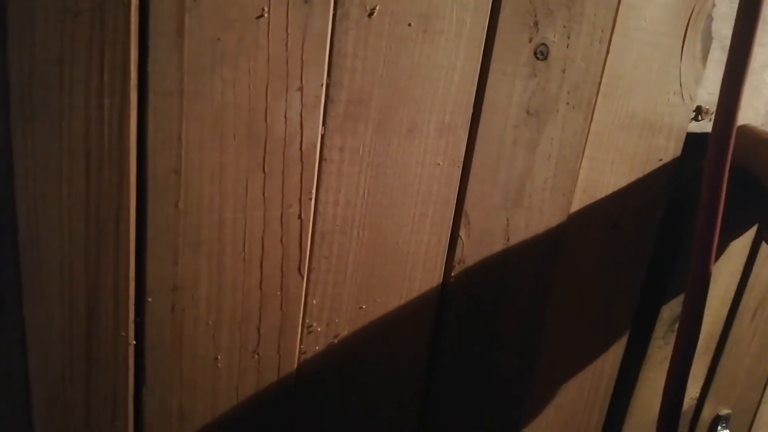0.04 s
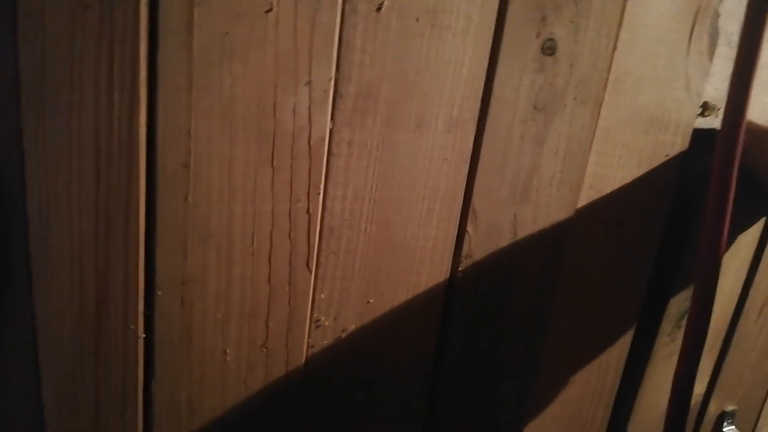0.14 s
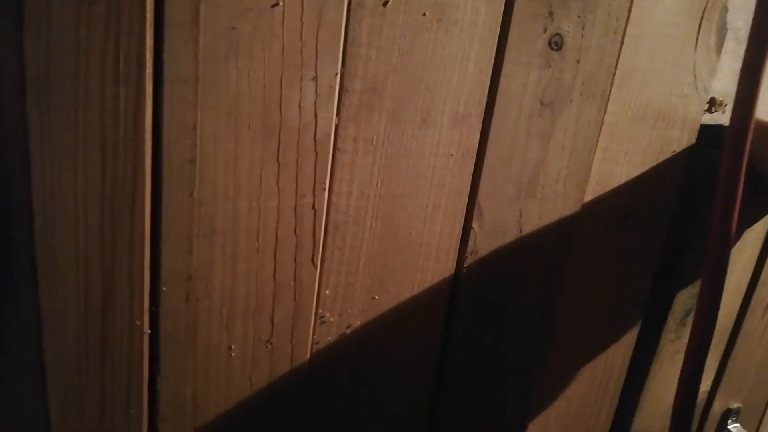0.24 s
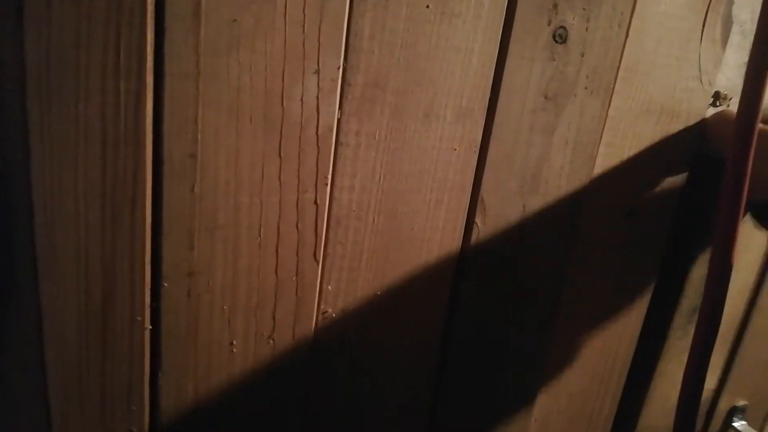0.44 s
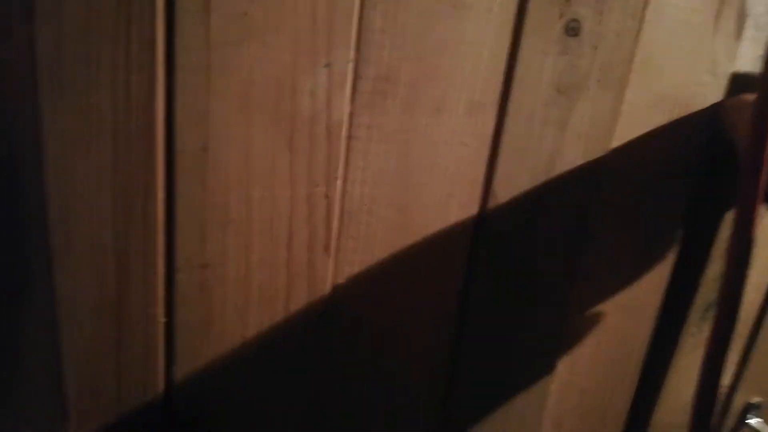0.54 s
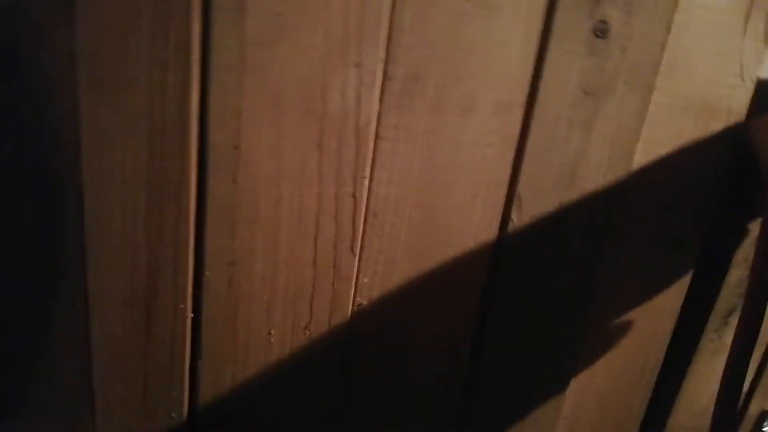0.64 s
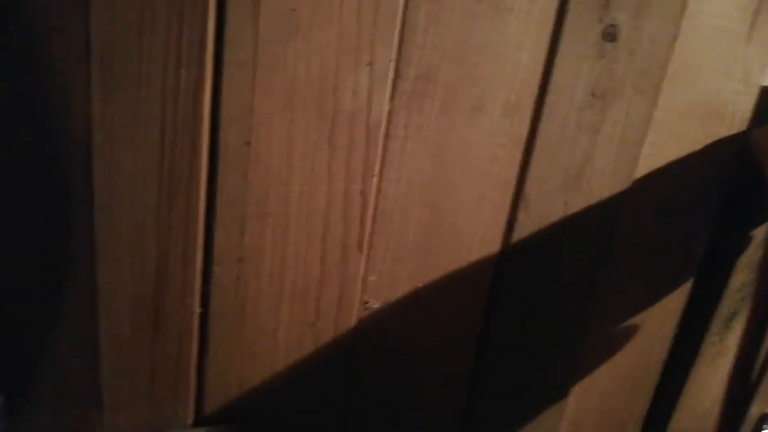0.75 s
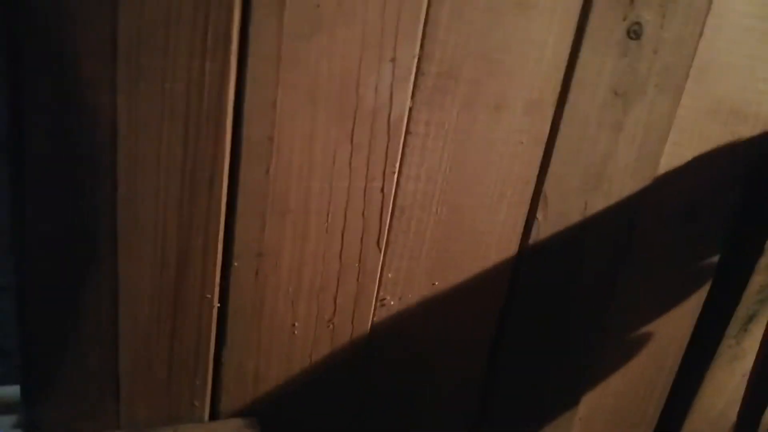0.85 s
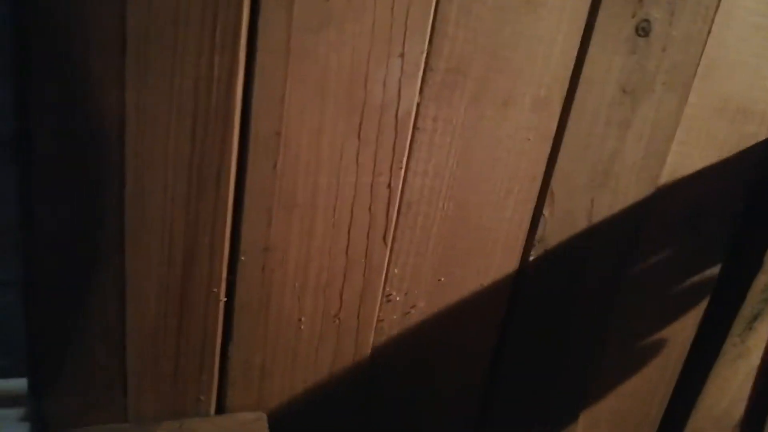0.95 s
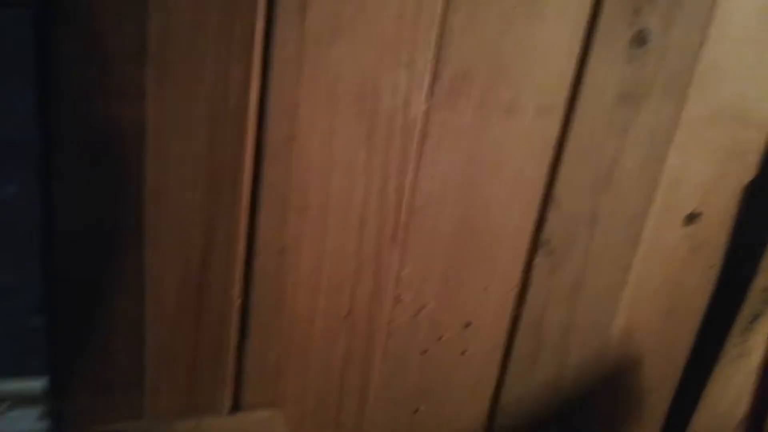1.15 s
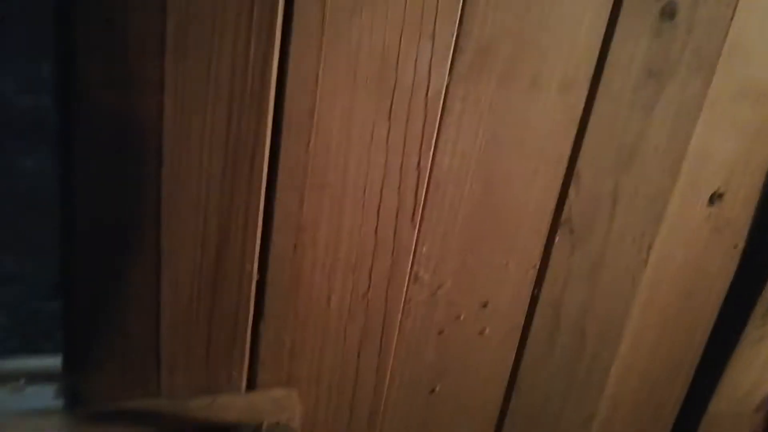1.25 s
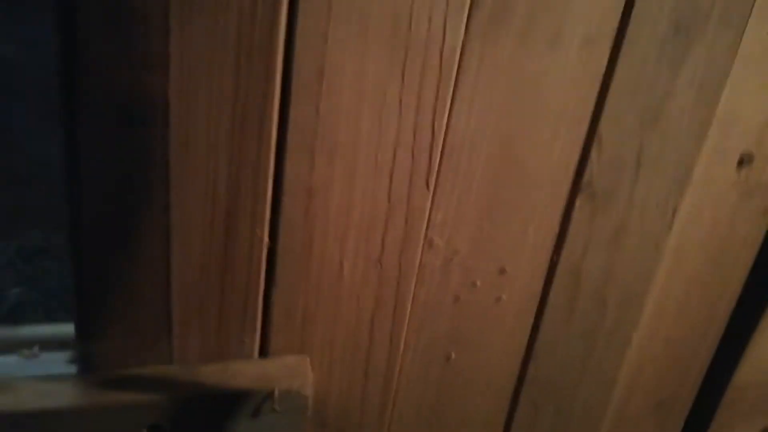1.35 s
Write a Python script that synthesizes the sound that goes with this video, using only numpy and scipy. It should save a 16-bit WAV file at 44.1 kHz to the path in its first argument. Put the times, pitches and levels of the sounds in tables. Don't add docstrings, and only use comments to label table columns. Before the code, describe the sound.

A small metal latch on a wooden door ticks once, scrapes briefly, then clacks hard with a quick rattle and dull knocks; afterwards only faint sleeve rustle in quiet night air, heard close up outdoors.

```python
import sys
import numpy as np
from scipy import signal
from scipy.fft import rfft, irfft
from scipy.io import wavfile
from scipy.ndimage import uniform_filter1d

SR = 44100
rng = np.random.default_rng(int(sys.argv[2]) if len(sys.argv) > 2 else 0)


def amplitude_ratio(level_db):
    exponent = np.asarray(level_db, float) / 20
    return 10 ** exponent


def to_wav(s):
    ch = np.atleast_2d(s).T
    pcm = np.round(np.clip(ch, -1, 1) * 32767)
    wavfile.write(sys.argv[1], SR, pcm.astype(np.int16))


N = 61739

# (frequency [Hz], density [dB per Hz])
AIR_SPECTRUM = [(120, -14), (200, -20.5), (448, 3), (558, -9.5), (1060, -9.5), (1210, -4.5), (1770, -10),
                (3690, -15), (16000, -22.5)]
# (frequency [Hz], density [dB per Hz])
RUMBLE_SPECTRUM = [(12, -37), (20, 2), (59, -5), (86, -9), (119, -3.5), (150, -13), (275, -14), (400, -35),
                   (520, -36), (880, -120)]
# (frequency [Hz], correlation [-1 to 1])
AIR_LIKENESS = [(60, 0.96), (130, 0.96), (290, 0.77), (640, -1.11), (1410, 0.87), (3100, -0.11),
                (6820, -0.55), (15000, -0.03)]
# (time [s], rustle level [dB], dark cloth share [0-1])
ARM_MOVEMENT = [(0, -57, 0.94), (.05, -63, 0.95), (.12, -64.5, 0.75), (.2, -67.5, 0.54), (.33, -79, 0.1),
                (.55, -60, 0.03), (.62, -57, 0.25), (.69, -56, 0), (.72, -61, 0), (.76, -68, 0.23),
                (.82, -60, 0.3), (.9, -62.5, 0), (1., -56.5, 0.28), (1.1, -53, 0.25), (1.16, -55.5, 0.2),
                (1.24, -54.5, 0.46), (1.3, -57.5, 0.45), (1.4, -61.5, 0.38)]
# (frequency [Hz], density [dB per Hz])
CLOTH_BRIGHT = [(500, -20.5), (900, -10.5), (1500, -11), (2300, -19), (3100, -10), (4200, -10),
                (9200, -2.5), (10800, -8), (15500, -19.5)]
# (frequency [Hz], density [dB per Hz])
CLOTH_DARK = [(71, -34), (120, -13.5), (975, -9), (1120, -12), (1830, -15.5), (2640, -7.5), (5840, -5.5),
              (15500, -38)]
# (centre time [s], span [s], level [dB], frequency [Hz])
FOLDS = [(1.049, 0.035, -64.5, 1295), (1.15, 0.02, -57.5, 1285), (1.8, .016, -63, 1300),
         (0.94, 0.025, -69, 4400), (1.195, 0.045, -71.5, 1700)]
# (time [s], peak level [dB], frequency [Hz], rise time [s])
KNOCKS = [(0.11, -53, 113.7, 0.024), (.2, -55, 98.4, 0.019), (0.341, -57, 55.5, 0.016),
          (0.432, -44, 114, 0.0077), (0.465, -39.5, 212, 0.0058), (.469, -37.5, 508, 0.0091),
          (.474, -33, 890, 0.0019), (.476, -24.5, 690, 0.0024), (.478, -46.5, 417, 0.019),
          (0.473, -40, 111.2, 0.019), (0.499, -42.5, 48.2, 0.05), (0.514, -49, 139, 0.015),
          (0.563, -33, 173, 0.0038), (.573, -28, 118, 0.0092), (0.58, -31, 48, 0.026),
          (0.608, -32.5, 122, 0.006), (0.632, -48, 134.7, 0.019), (0.689, -48.5, 57.7, 0.02)]
# (frequency [Hz], T60 [s])
YARD_DECAY = [(1000, 0.13), (4400, 0.097), (9000, 0.1), (15000, 0.053)]
# (time [s], level [dB])
SLIDE_UP = [(.33, -87), (.342, -49.5), (.354, -45), (.375, -43), (.393, -41.5), (.405, -43.5),
            (.415, -43.5), (.45, -52), (.46, -87)]
# (time [s], level [dB])
SLIDE_HOME = [(.448, -67), (.455, -42.5), (.468, -34.5), (.485, -38), (.502, -44), (.53, -49.5),
              (.55, -54.5), (.57, -56.5), (.6, -65.5)]
# (frequency [Hz], density [dB per Hz])
UP_SPECTRUM = [(250, -10.5), (450, -21), (800, -8.5), (1150, -13.5), (2400, -1), (4000, -7.5), (8000, -7.5),
               (11500, -12.5), (14500, -33)]
# (frequency [Hz], density [dB per Hz])
HOME_SPECTRUM = [(150, -31), (250, -10), (906, -2.5), (1420, -8), (2160, -4), (2360, -6.5), (7980, -4),
                 (13900, -15.5), (16000, -45)]
# (frequency [Hz], width [Hz], level [dB], centre time [s], span [s])
UP_RINGS = [(1706, 69, 1.5, 0.365, 0.018), (1664, 130, -4, .394, 0.0063), (7800, 130, -10, 0.384, 0.015),
            (6860, 130, -19, 0.37, 0.017), (9150, 180, -24, .37, 0.053), (11000, 200, -19, 0.48, 0.018)]
# (frequency [Hz], width [Hz], level [dB], centre time [s], span [s])
HOME_RINGS = [(8300, 400, -13, 0.497, 0.054), (6170, 180, -2, .465, .008), (1746, 50, -13.5, 0.493, 0.027)]
# (time [s], peak level [dB], frequency [Hz], T60 [s])
GLANCES = [(0.2123, -26.5, 6830, 0.01), (.2118, -30.5, 5540, .016), (.2128, -34.5, 1550, 0.013),
           (.2150, -42.5, 1250, 0.0081), (.2210, -50, 7400, .012), (.4137, -24, 6170, .012),
           (.4160, -32, 7900, .01), (.4191, -34, 8100, .01), (0.4214, -24, 8850, 0.0054),
           (.4228, -22, 6370, 0.012), (.4528, -28, 7740, 0.0089), (.4558, -34, 7460, .01),
           (0.4596, -35, 8300, .01), (.4645, -39, 5970, 0.011), (.4679, -33, 6320, 0.0081),
           (0.4777, -30, 8300, 0.01), (0.4825, -39, 8100, 0.015), (0.4883, -41, 8300, 0.017)]
# (time [s], peak level [dB], brightness [dB per octave], pitch of the loose part [Hz])
TICKS = [
    (.2086, -41, 6, 4050),
    (.2093, -16.5, 2, 4050),
    (.2150, -33.5, -3.5, 4050),
    (.2200, -35, -6, 4050),
    (.821, -45.5, 14, 4050),
]
# (time [s], peak level [dB], brightness [dB per octave], pitch of the loose part [Hz])
CLACKS = [(.4095, -37, 19, 4370), (.4106, -5, 0, 4374), (.4133, -19, -3, 4700), (.4155, -32.5, -19, 4400),
          (.4192, -16, 2, 4420), (.4238, -35, -6, 4530), (.4268, -31, 7, 4560), (.4308, -30, -2, 4700),
          (.4343, -36, -8, 4340), (.4405, -26.5, -6, 4540), (.4527, -16.5, 3.5, 4110),
          (.4556, -23, 7, 4070), (.4601, -23, 6, 4800), (.4650, -31, 7, 3560), (.4695, -33, 8, 4180)]
# (frequency [Hz], level [dB], T60 [s], left minus right [dB])
HANDLE_MODES = [(1076, -18, 0.022, -7), (1468, -9, 0.032, 7.5), (4050, -0.5, 0.018, -7),
                (3940, -19, 0.14, -10), (4130, -21, 0.09, -1), (5740, -12.5, 0.009, 2),
                (7300, -8.5, 0.009, 12), (8100, 1, .009, 3), (9100, -5.5, 0.012, -7),
                (9780, 0.5, 0.0078, -13), (11500, -24, 0.006, -5), (12500, -21, .006, -15)]
# (frequency [Hz], level [dB], T60 [s], left minus right [dB])
BAR_MODES = [(1140, -32, 0.021, -10), (1550, -13.5, 0.02, 8.5), (2320, -14, 0.015, -1),
             (4370, -1.5, 0.017, -5), (4200, -40, 0.062, -3), (4290, -24.5, 0.14, 2),
             (4800, -10, 0.017, -8), (5600, -24, .009, 4), (7280, -19, .009, 0), (8020, -9, .009, 0),
             (9300, -9, .009, -7), (11900, -20, 0.0035, -10), (13750, -27, 0.004, -10),
             (14800, -22, 0.0046, -16)]

LAG = 11
AIR_DB, RUMBLE_DB, CALMING_DB_PER_S = -68.5, -68, -3
ARM_LEAN_DB, FOLD_WIDTH_HZ = -3.5, 37
PLANK_LEAN_DB, PLANK_LAG, BODY_LAG = -3.5, 34, 2
SHUDDER_DB, SHUDDER_HZ, SHUDDER_WIDTH_HZ = -16, 206, 89
YARD_DB, YARD_ONSET_S = -11, 0.00076
GLANCE_RISE_S, GLANCE_LEAN_DB = 0.00043, -1
CRACK_S, CRACK_DB, GRIT_DB, GRIT_T60_S = 0.0006, -5.5, -9.5, 0.028
SPREAD_DB, SPREAD_RAD = 1.5, 0.4
FREE_BELOW_HZ, LOOSE_ABOVE_HZ, DAMPED_T60_S, DAMPED_SPREAD = 5200, 3000, 0.007, 0.008
EDGE_HZ, TOP_HZ = 15750, 16500
TIME = np.arange(N) / SR


def evened(x):
    return x / np.sqrt(np.mean(x ** 2) + 1e-20)


def read(points, hz):
    f, value = np.transpose(points)
    return np.interp(np.log(hz + 1), np.log(f + 1), value)


def follow(rows, axis=1):
    return np.interp(TIME, np.transpose(rows)[0], np.transpose(rows)[axis])


def swell(s, span):
    return np.exp(-((TIME - s) / span) ** 2)


def colour(x, points):
    hz = np.fft.rfftfreq(N, 1 / SR)
    limits = np.minimum(hz / points[0][0], 1) ** 2 * (hz < EDGE_HZ)
    return evened(irfft(rfft(x) * amplitude_ratio(read(points, hz)) * limits, N))


def ring(x, hz, width):
    r = np.exp(-np.pi * width / SR)
    return evened(signal.lfilter([1], [1, -2 * r * np.cos(2 * np.pi * hz / SR), r * r], x))


def grit(per_s, spread_db, share):
    happens = rng.random((3, N)) < per_s / SR
    size = amplitude_ratio(spread_db * np.minimum(rng.exponential(1, (3, N)), 4))
    left, right, shared = rng.standard_normal((3, N)) * happens * size
    share = np.clip(share, 0, 1)
    apart = np.sqrt(1 - share) * np.array([left, right])
    return apart + np.sqrt(share) * np.array([np.roll(shared, LAG), shared])


def place(out, s, left, right):
    at = round(s * SR)
    out[0, at + LAG:at + LAG + len(left)] += left
    out[1, at:at + len(right)] += right


def night():
    drift = uniform_filter1d(rng.standard_normal(N), 2500)
    lumps = amplitude_ratio(CALMING_DB_PER_S * (TIME - 1.5) + 2 * evened(drift))

    def air():
        hiss = amplitude_ratio(AIR_DB) * colour(rng.standard_normal(N), AIR_SPECTRUM)
        rumble = amplitude_ratio(RUMBLE_DB) * lumps * colour(rng.standard_normal(N), RUMBLE_SPECTRUM)
        return rfft(hiss + rumble)

    left, other = air(), air()
    same = np.clip(read(AIR_LIKENESS, np.fft.rfftfreq(N, 1 / SR)), -1, 1)
    return irfft([left, same * left + np.sqrt(1 - same ** 2) * other], N)


def sleeve():
    dark_share = np.clip(follow(ARM_MOVEMENT, axis=2), 0, 1)
    flicker = amplitude_ratio(0.93 * evened(uniform_filter1d(rng.standard_normal(N), 400)))
    lean = amplitude_ratio([[ARM_LEAN_DB / 2], [-ARM_LEAN_DB / 2]])
    dark = colour(grit(14000, 2.1, 0.39), CLOTH_DARK)
    bright = colour(grit(14000, 3.0, 0.21), CLOTH_BRIGHT) * lean
    rub = np.sqrt(dark_share) * dark + np.sqrt(1 - dark_share) * bright
    fold = grit(9000, 1.5, 0.27)
    hum = sum(amplitude_ratio(db) * swell(s, span) * ring(fold, hz, FOLD_WIDTH_HZ) for s, span, db, hz in FOLDS)
    return amplitude_ratio(follow(ARM_MOVEMENT)) * flicker * rub + hum


def knocks():
    out, shake = np.zeros((2, N)), np.zeros(N)
    for s, db, hz, rise in KNOCKS:
        u = np.maximum(TIME - s, 0) / rise
        shape = amplitude_ratio(db) * (u * np.exp(1 - u)) ** 1.94
        tone = shape * np.sin(2 * np.pi * hz * (TIME - s))
        if hz > 300:
            out += [amplitude_ratio(PLANK_LEAN_DB) * np.roll(tone, PLANK_LAG), tone]
        else:
            out += [np.roll(tone, BODY_LAG), tone]
        shake += shape ** 2
    rattle = rng.standard_normal((2, N)) + 0.98 * rng.standard_normal(N)
    return out + amplitude_ratio(SHUDDER_DB) * np.sqrt(shake) * ring(rattle, SHUDDER_HZ, SHUDDER_WIDTH_HZ)


def yard(x):
    hz, t, z = signal.stft(rng.standard_normal((2, 9000)), SR, nperseg=128)
    fading = z * amplitude_ratio(-60 * t / read(YARD_DECAY, hz)[:, None])
    tail = signal.istft(fading, SR, nperseg=128)[1]
    tail = tail * np.clip(np.arange(tail.shape[1]) / SR / YARD_ONSET_S, 0, 1)
    return signal.fftconvolve(x, tail / np.linalg.norm(tail[0]), axes=1)[:, :N]


def slide(pressure, spectrum, rings):
    slips = grit(20000, 1.16, 0.073)
    sound = colour(slips, spectrum)
    for hz, width, db, s, span in rings:
        sound = sound + amplitude_ratio(db) * swell(s, span) * ring(slips, hz, width)
    return amplitude_ratio(follow(pressure)) * sound


def glances():
    out, t = np.zeros((2, N)), np.arange(3000) / SR
    for s, db, hz, t60 in GLANCES:
        envelope = amplitude_ratio(db - 60 * t / t60) * np.minimum(t / GLANCE_RISE_S, 1)
        tone = envelope * np.sin(2 * np.pi * hz * t)
        place(out, s, amplitude_ratio(GLANCE_LEAN_DB / 2) * tone, amplitude_ratio(-GLANCE_LEAN_DB / 2) * tone)
    return out


def strikes(events, modes):
    out, t = np.zeros((2, N)), np.arange(5000)[:, None] / SR
    hz, db, t60, lean_db = np.transpose(modes)
    damped = hz > FREE_BELOW_HZ
    loose = ~damped & (hz > LOOSE_ABOVE_HZ)
    mounted_t60 = np.where(damped, np.minimum(t60, DAMPED_T60_S), t60)
    onset = np.sin(np.pi / 2 * np.minimum(t / CRACK_S, 1)) ** 2
    crack = (t / CRACK_S * np.exp(1 - t / CRACK_S)) ** 1.6
    decay = amplitude_ratio(-60 * t / mounted_t60) * onset + amplitude_ratio(CRACK_DB) * (hz > LOOSE_ABOVE_HZ) * crack
    band = signal.butter(3, [3300, 10800], "bandpass", fs=SR)
    spray_decay = amplitude_ratio(GRIT_DB - 60 * t.T / GRIT_T60_S)
    for s, peak_db, tilt_db, pitch_hz in events:
        phase_luck, level_luck, pitch_luck = rng.standard_normal((3, len(hz)))
        spray = signal.lfilter(*band, rng.standard_normal((2, len(t)))) * spray_decay
        seated_hz = np.where(loose, hz * pitch_hz / hz[loose][0], hz)
        struck_hz = seated_hz * (1 + DAMPED_SPREAD * damped * pitch_luck)
        wave = np.cos(2 * np.pi * struck_hz * (t - CRACK_S) + SPREAD_RAD * phase_luck) * decay
        level = amplitude_ratio(db + tilt_db * np.log2(hz / 4400) + SPREAD_DB * level_luck)
        level = level / abs(wave @ level).max()
        left = wave @ (level * amplitude_ratio(lean_db / 2)) + 0.58 * spray[0]
        right = wave @ (level * amplitude_ratio(-lean_db / 2)) + spray[1]
        place(out, s, amplitude_ratio(peak_db) * left, amplitude_ratio(peak_db) * right)
    return out


def scene():
    latch = strikes(TICKS, HANDLE_MODES) + strikes(CLACKS, BAR_MODES) + glances()
    bolt = slide(SLIDE_UP, UP_SPECTRUM, UP_RINGS) + slide(SLIDE_HOME, HOME_SPECTRUM, HOME_RINGS)
    return latch + amplitude_ratio(YARD_DB) * yard(latch) + bolt + knocks() + sleeve() + night()


def top_cut(x):
    return signal.sosfilt(signal.butter(12, 16650, fs=SR, output="sos"), x)


def record(dry):
    lowpass = signal.firwin(255, TOP_HZ, fs=SR)
    mix = signal.oaconvolve(dry, lowpass[None], "same")
    return top_cut(mix)


dry = scene()
out = record(dry)
to_wav(out)
```